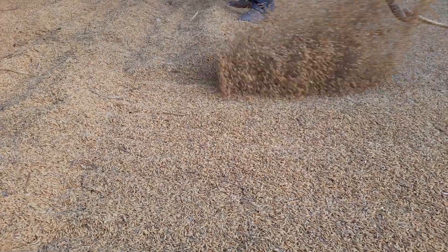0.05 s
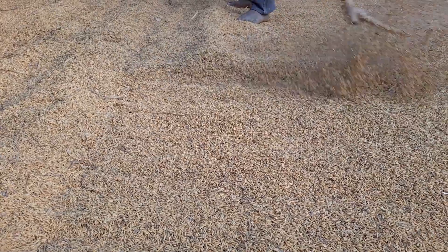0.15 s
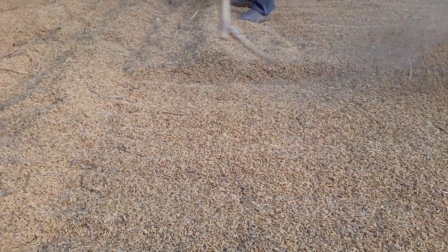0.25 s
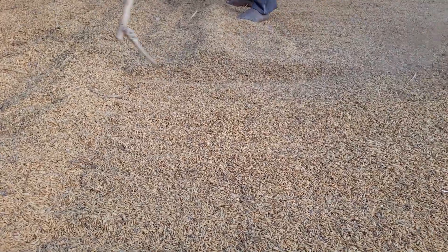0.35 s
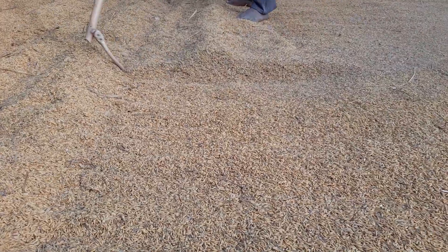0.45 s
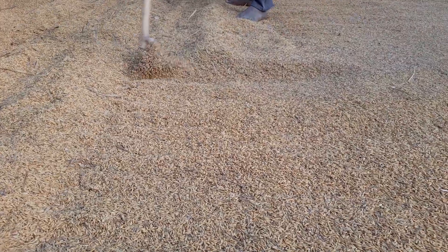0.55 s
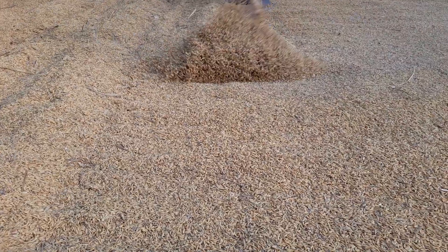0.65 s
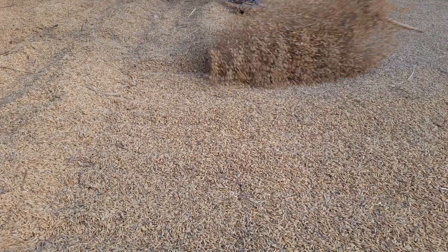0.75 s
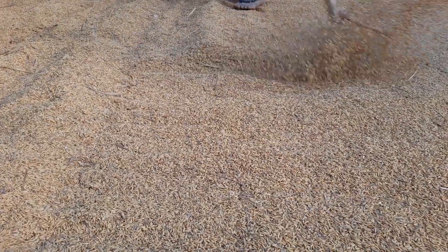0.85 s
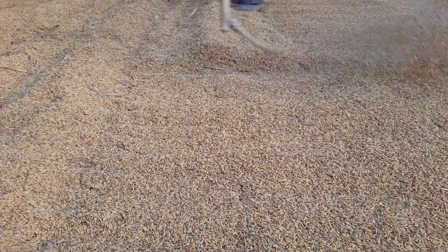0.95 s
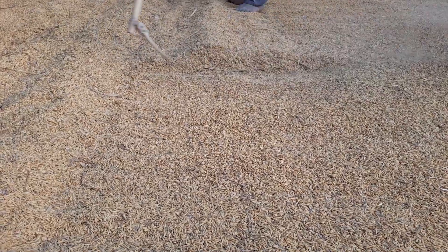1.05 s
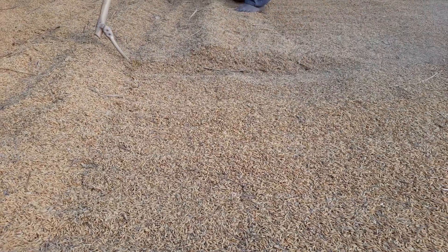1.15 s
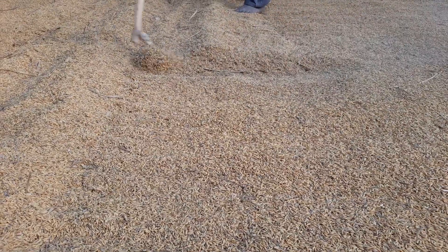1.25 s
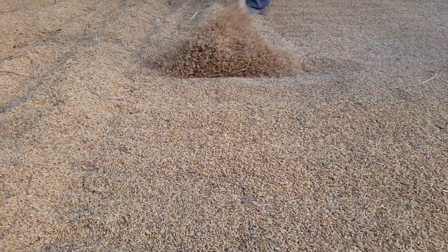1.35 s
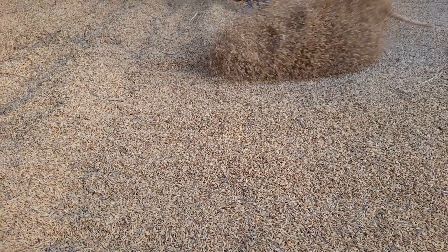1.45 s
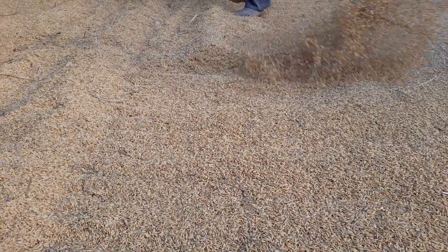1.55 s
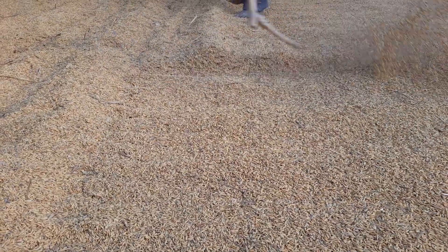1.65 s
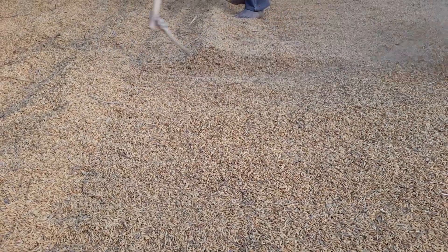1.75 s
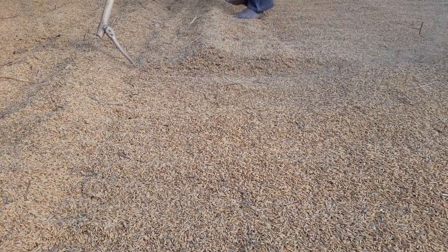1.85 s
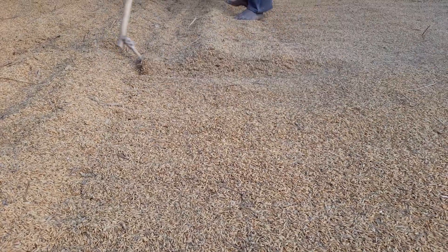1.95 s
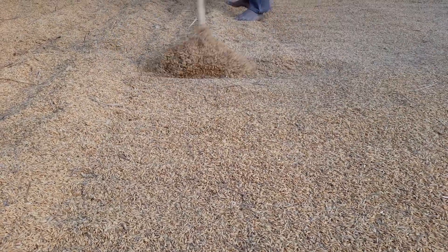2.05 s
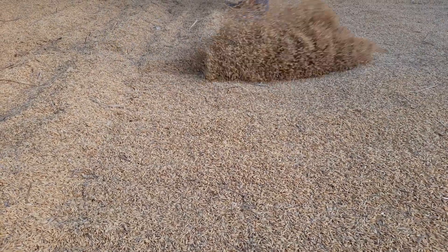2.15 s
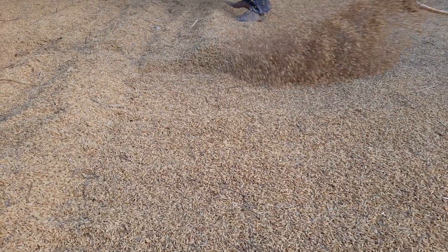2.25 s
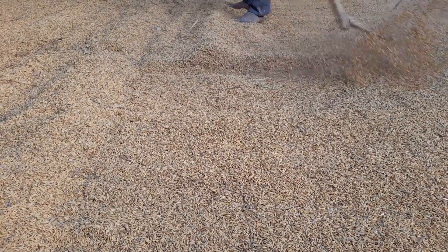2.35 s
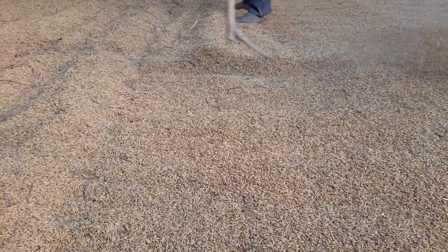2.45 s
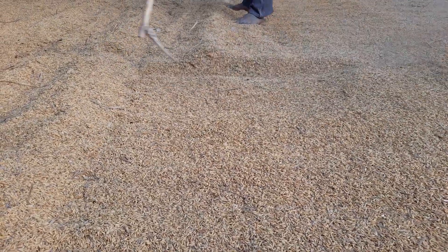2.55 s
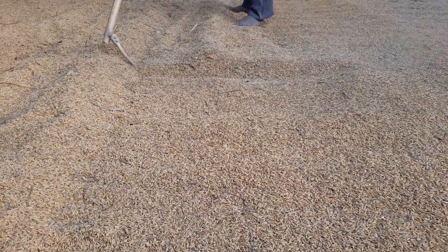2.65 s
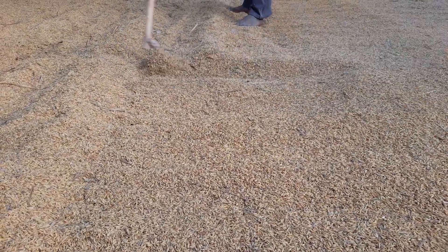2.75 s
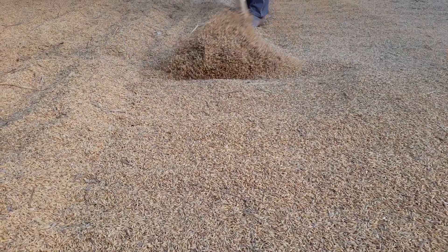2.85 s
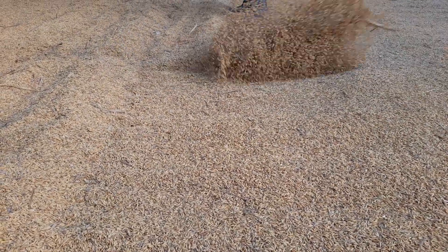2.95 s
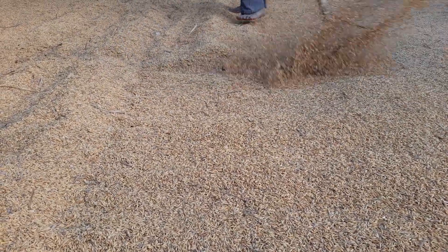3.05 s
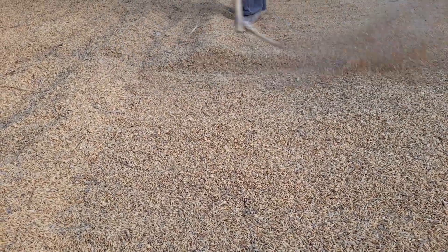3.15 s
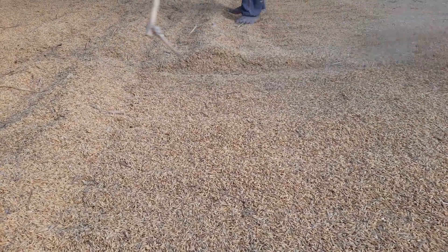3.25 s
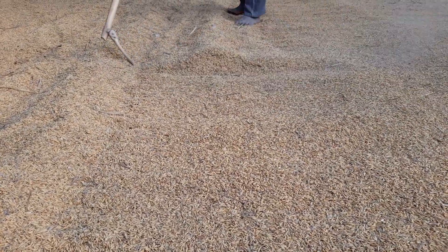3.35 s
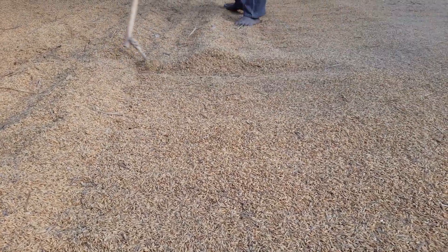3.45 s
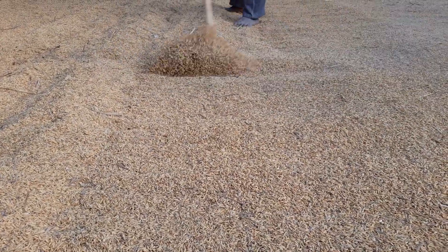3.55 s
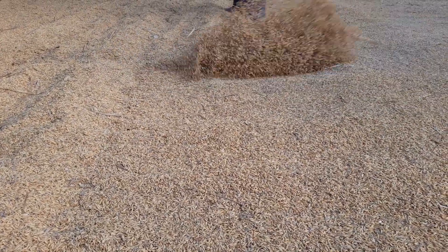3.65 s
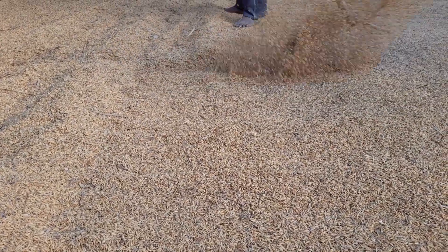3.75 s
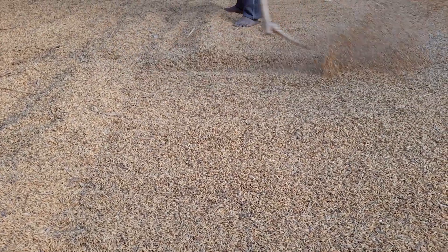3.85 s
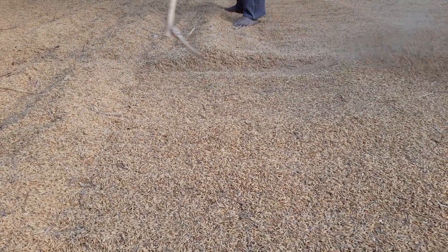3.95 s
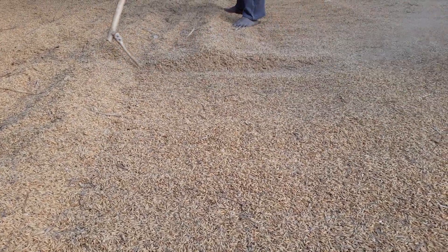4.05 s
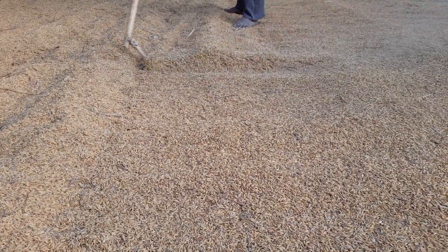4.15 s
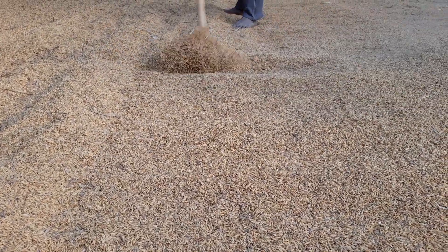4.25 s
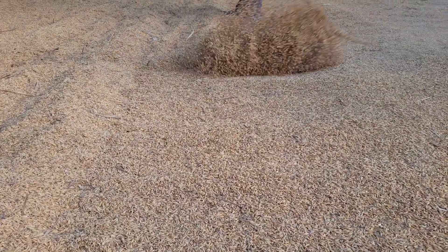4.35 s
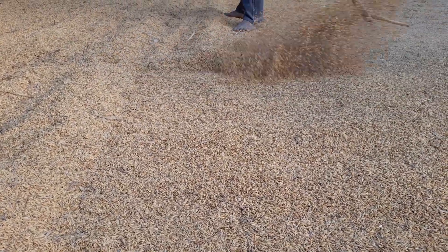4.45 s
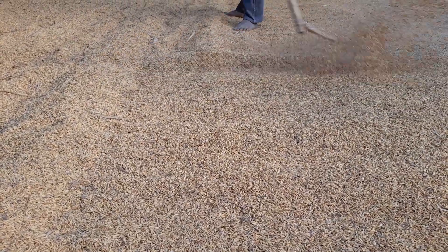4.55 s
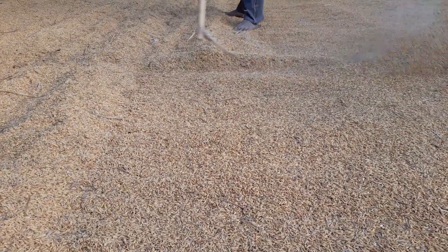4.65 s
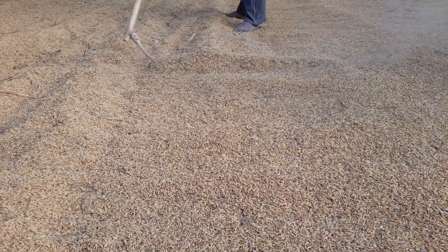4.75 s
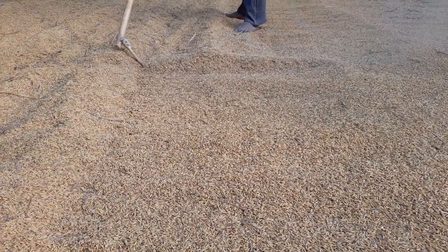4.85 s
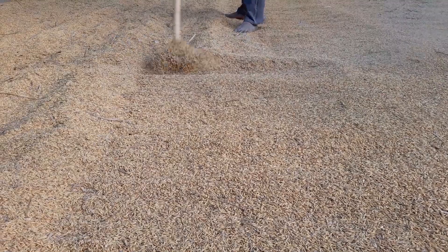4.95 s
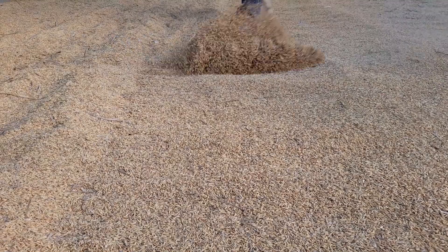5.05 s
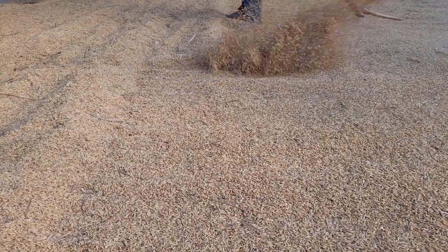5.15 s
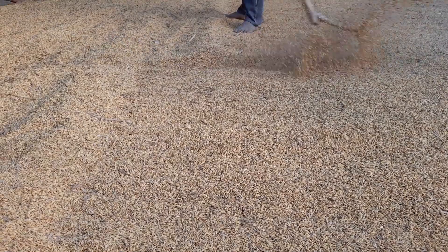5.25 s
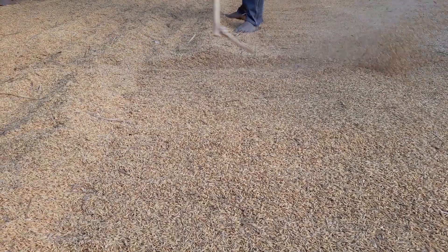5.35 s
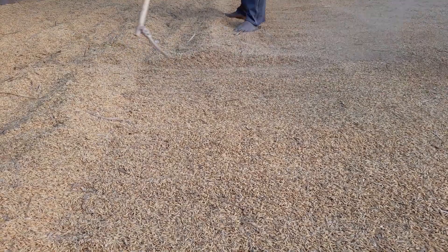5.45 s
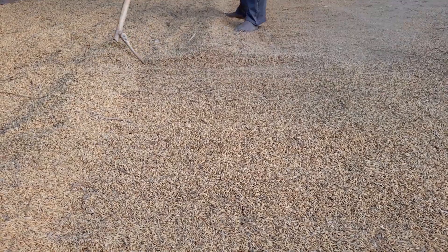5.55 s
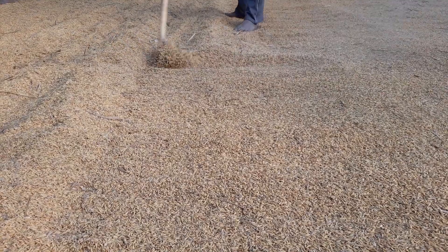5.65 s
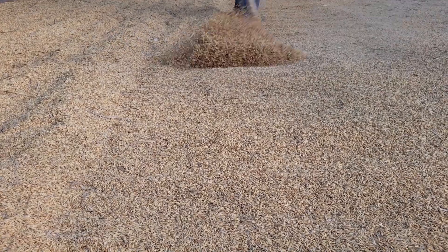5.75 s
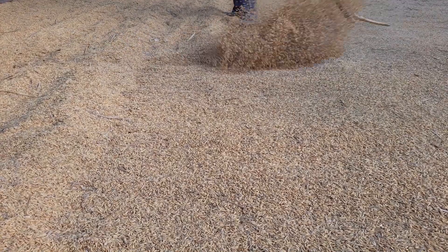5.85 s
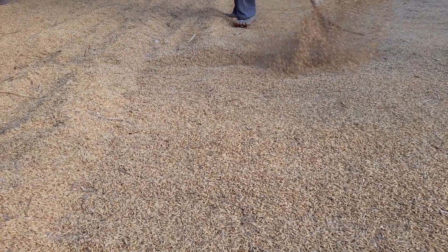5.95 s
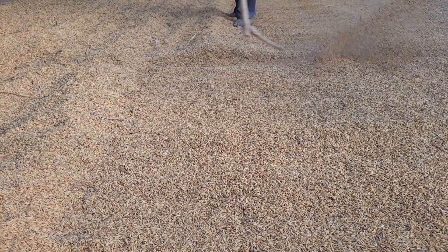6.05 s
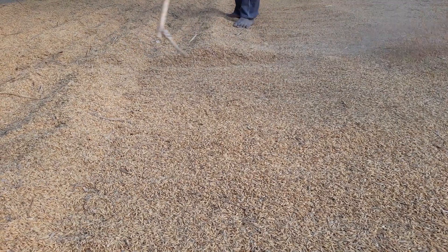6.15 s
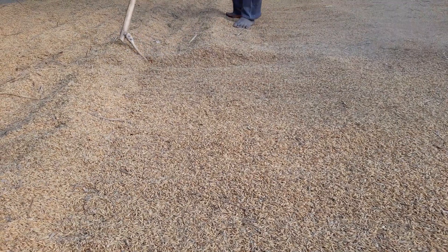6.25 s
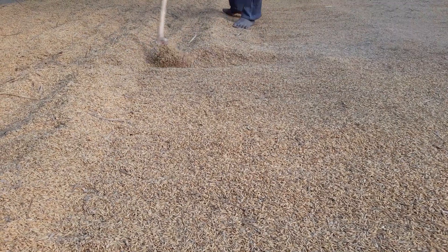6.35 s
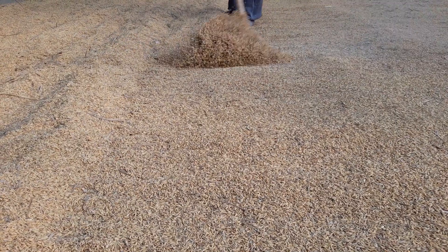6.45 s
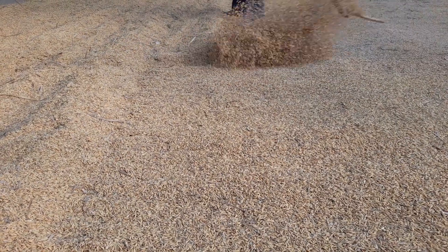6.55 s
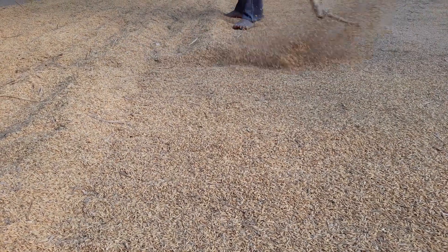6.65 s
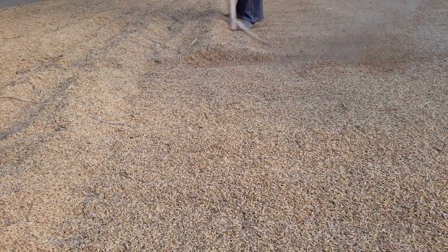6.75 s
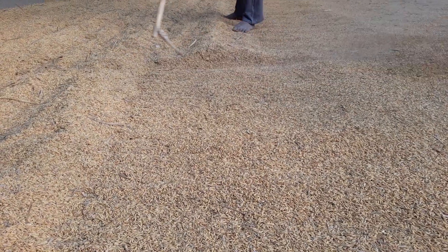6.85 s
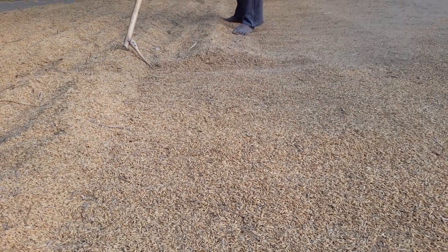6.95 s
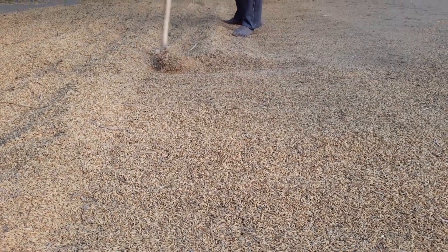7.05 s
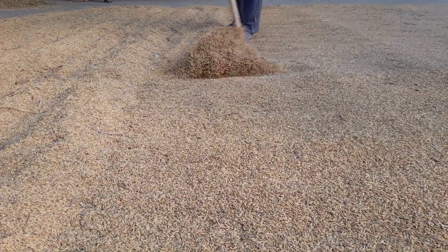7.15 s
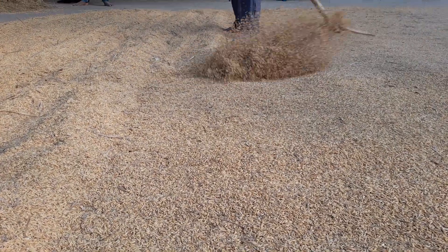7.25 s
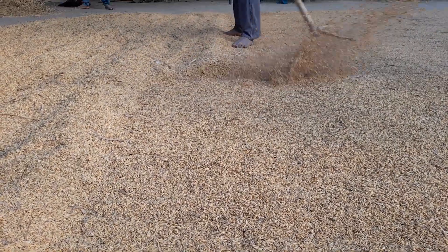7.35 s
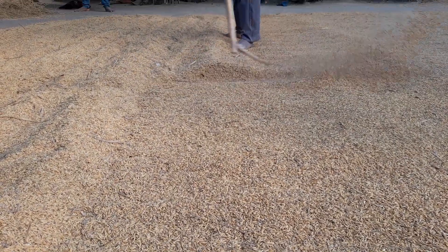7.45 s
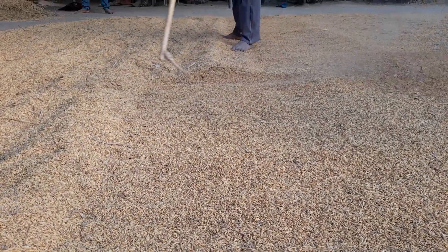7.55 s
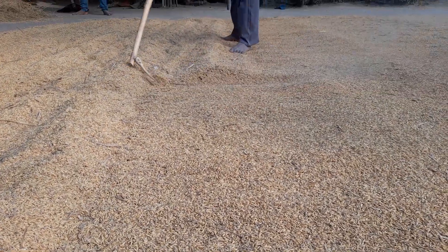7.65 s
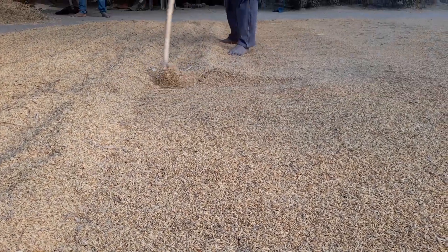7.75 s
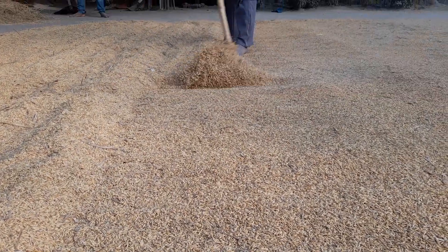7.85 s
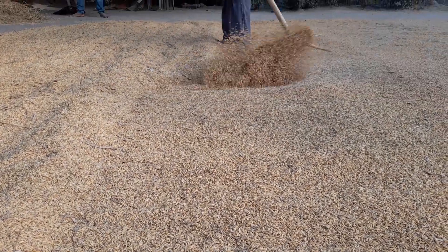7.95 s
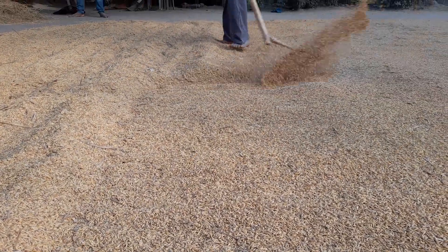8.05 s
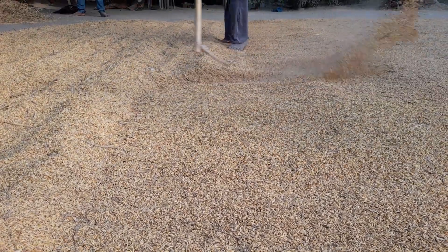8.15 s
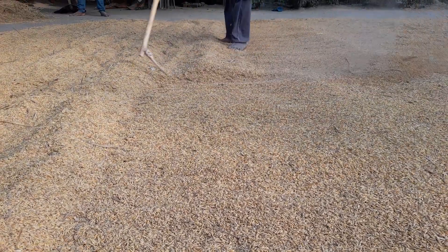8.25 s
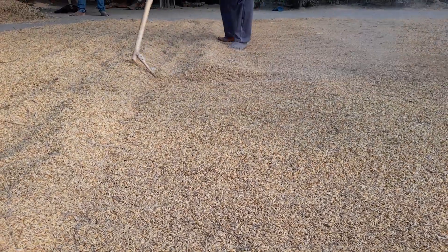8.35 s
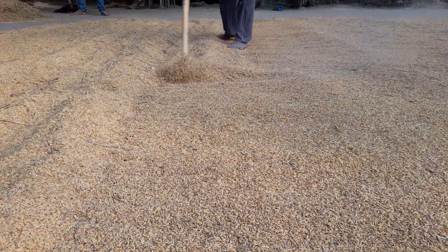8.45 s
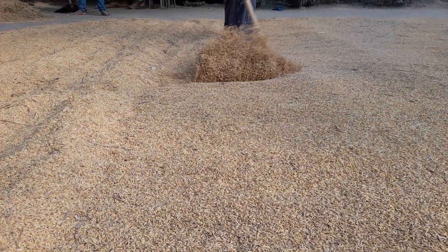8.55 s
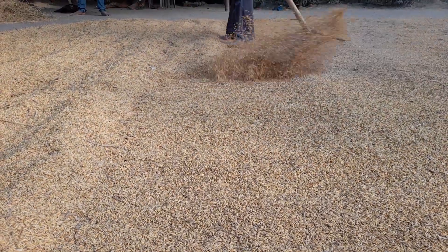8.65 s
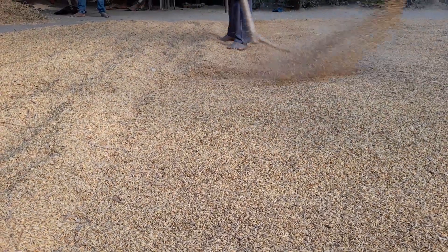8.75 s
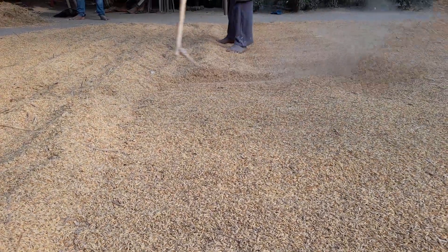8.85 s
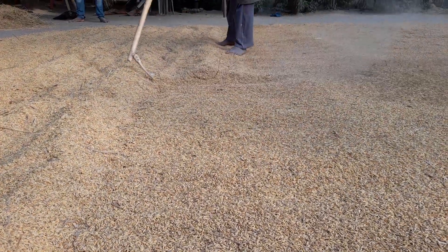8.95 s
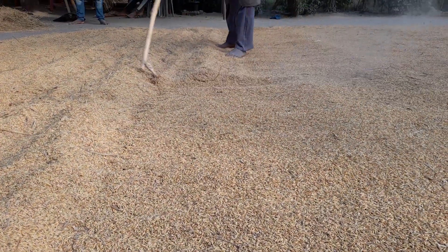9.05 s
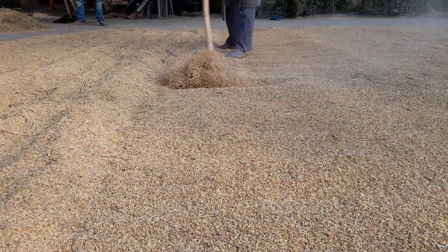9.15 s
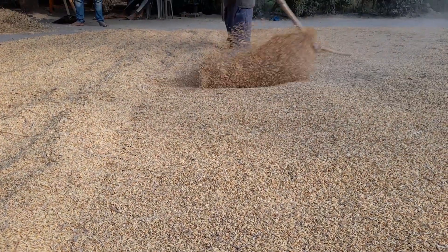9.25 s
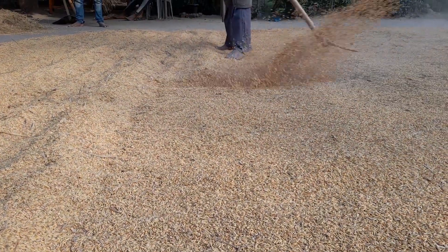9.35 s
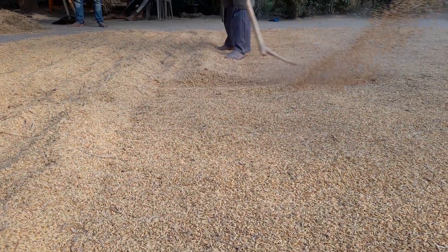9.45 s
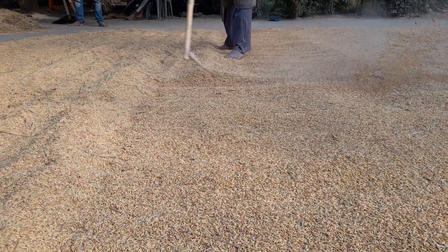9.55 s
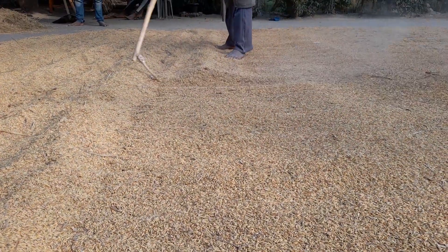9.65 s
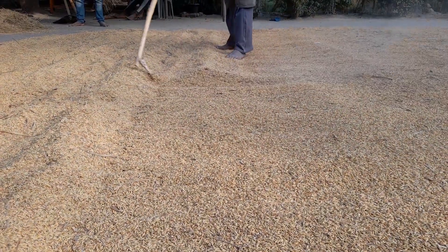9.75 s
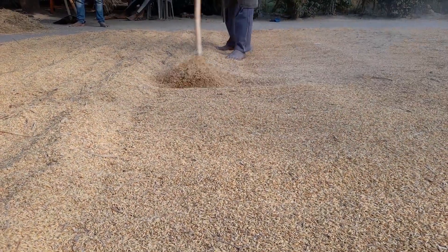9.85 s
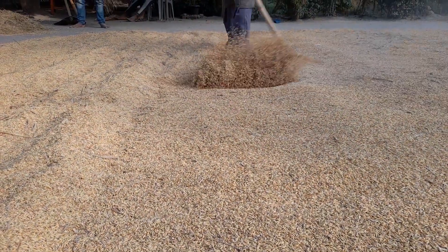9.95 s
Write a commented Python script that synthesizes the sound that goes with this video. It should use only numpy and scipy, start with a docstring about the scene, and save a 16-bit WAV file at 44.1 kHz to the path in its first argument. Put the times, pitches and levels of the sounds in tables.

```python
"""Raking grain in an open yard

A long wooden rake flings drying grain across a yard, a stroke about every 0.7 s. Streams of random tiny
impacts, shaped by spectra and resonances, make the blade crunch through the layer and ring on the ground.
Chirps of a few cycles are its judders. A sheet of grain lands with a short rush of impacts, and sparser
ones are husks and stragglers that hiss down until the next stroke."""
import sys
import numpy as np
from scipy import signal
from scipy.fft import rfft, irfft
from scipy.io import wavfile
from scipy.ndimage import map_coordinates

SR = 44100
rng = np.random.default_rng(int(sys.argv[2]) if len(sys.argv) > 2 else 0)


def unload_wav(signal):
    """Save mono or channel-first audio to the path in sys.argv[1] as 16-bit WAV at rate SR, clipped to [-1, 1]."""
    wavfile.write(
        sys.argv[1],
        SR,
        np.round(np.clip(np.atleast_2d(signal).T, -1, 1) * 32767).astype(np.int16),
    )


N = 440559
TIME = np.arange(N) / SR
BINS = np.maximum(np.fft.rfftfreq(N, 1 / SR), 1)   # frequencies in Hz, kept above 0 for the logarithm

# The rake strokes, the first already under way; levels are relative:
# [release t/s, time on the ground before it/s, time pushing the heap/s,
#  crunch level/dB, scrape level/dB, level of the spray of husks off the blade/dB]
RAKE_STROKES = [(0.014, 0.2, .17, -36.5, -31, -24.5), (0.744, 0.2, 0.17, -37.5, -31.5, -28.5),
                (1.454, 0.31, .17, -39, -31.5, -27.5), (2.198, 0.23, 0.17, -36, -31.5, -27),
                (2.945, 0.254, 0.13, -36, -31, -29.5), (3.678, 0.254, 0.14, -37, -30.5, -28.5),
                (4.372, 0.225, 0.15, -37, -30, -28), (5.111, 0.33, 0.15, -36, -31.5, -28.5),
                (5.832, 0.23, 0.15, -39, -31, -28), (6.531, .24, 0.14, -38, -32.5, -29),
                (7.238, 0.22, .15, -38, -32.5, -28.5), (7.937, 0.45, .16, -43, -33, -32),
                (8.604, 0.26, .135, -41, -34, -31.5), (9.267, 0.23, .12, -37.5, -33, -29.5),
                (9.982, 0.53, 0.11, -39, -34, -31.5)]
# Each thrown sheet comes down; levels are relative: [t/s, length/s, kernel level/dB, husk level/dB]
SHEET_LANDINGS = [(0.144, .08, -42, -31), (0.865, 0.082, -41.5, -31), (1.554, 0.086, -41.5, -29.5),
                  (2.311, 0.088, -42, -30.5), (3.066, 0.075, -41, -32.5), (3.81, 0.054, -47.5, -35),
                  (4.545, 0.048, -44, -31.5), (5.218, .09, -42, -34.5), (5.954, 0.093, -50, -36),
                  (6.642, 0.083, -41.5, -35), (7.336, 0.092, -42, -36.5), (8.014, 0.085, -50, -39),
                  (8.713, 0.076, -44.5, -36.5), (9.37, 0.11, -48.5, -37)]


def from_db(db):
    """Decibels to gain."""
    return 10 ** (np.asarray(db) / 20)


def rms_one(x):
    """Scale to an average strength (rms) of 1."""
    return x / np.sqrt(np.mean(x ** 2) + 1e-20)


def per_bin(points):
    """Read a table at every frequency, with straight lines over log frequency."""
    hz, values = np.transpose(points)
    return np.interp(np.log(BINS), np.log(hz), values)


def envelope(start_s, end_s, rise_db_per_s, fall_db_per_s, growth_db_per_s=0):
    """Gain that rises until start_s, holds or grows to 1 at end_s, then dies away."""
    early = np.maximum(start_s - TIME, 0)
    late = np.maximum(TIME - end_s, 0)
    still_to_grow = end_s - np.clip(TIME, start_s, end_s)
    db_below = rise_db_per_s * early + growth_db_per_s * still_to_grow + fall_db_per_s * late
    return from_db(-np.minimum(db_below, 200))


def drift(rate):
    """Smooth chance with spread 1 that changes about rate times a second."""
    knots = rng.standard_normal(6000)
    # straight lines between the knots shrink the spread, so it is restored
    return np.interp(TIME * rate, np.arange(len(knots)), knots) * np.sqrt(3 / 2)


def grains(per_s, spread_db):
    """Two unrelated streams of tiny impacts: many faint, a few strong."""
    sizes = from_db(spread_db * np.minimum(rng.exponential(1, (2, N)), 5))
    signs = rng.choice([-1, 1], (2, N))
    hits = rng.random((2, N)) < per_s / SR
    return rms_one(sizes * signs * hits)


def colour(points):
    """Response with the given spectrum that never sounds ahead of its impact (minimum phase)."""
    cepstrum = irfft(np.log(from_db(per_bin(points))), N)
    # fold the half before time zero onto the half after it
    cepstrum[1:N // 2] *= 2
    cepstrum[N // 2:] = 0
    return np.exp(rfft(cepstrum))


def body(modes):
    """Response of resonances side by side, with alternating signs."""
    response = 0
    for k, (hz, width, db) in enumerate(modes):
        detuning = hz / width * (BINS / hz - hz / BINS)
        response = response + (-1) ** k * from_db(db) / (1 + 1j * detuning)
    return response


def radiate(force, response, focus=0.88):
    """Two force streams sound at both microphones; focus 1 is a compact source, 0 a spread one."""
    # weight on each source's left-right likeness: [f/Hz, weight]
    likeness = [(50, 1.03), (300, 1), (900, 1), (2500, 0.9), (4000, 0.9), (7000, 0.67), (14000, 1.5)]
    # left minus right microphone: [f/Hz, difference/dB]
    balance = [(1500, 0), (2700, 0.7), (4800, -1.5), (6500, 0.6), (8700, -0.5), (11000, 1.5), (12300, 0),
               (13600, 9), (15500, -0.5)]
    mid, side = rfft(force) * response
    alike = np.clip(focus * per_bin(likeness), 0, .99)
    sides = np.array([[1], [-1]])   # left, right
    pair = np.sqrt(1 + alike) * mid + sides * np.sqrt(1 - alike) * side
    out = irfft(pair * from_db(sides * per_bin(balance) / 2), N)
    return out / np.std(out.mean(axis=0))


def place(pair, lead_s):
    """A source on the left reaches the left microphone lead_s earlier."""
    shifted = []
    for x, sign in zip(pair, (1, -1)):
        read_at = np.arange(N) + sign * lead_s * SR / 2
        shifted.append(map_coordinates(x, [read_at], order=5))
    return np.array(shifted)


def yard(air_db=-65):
    """Steady noise shaped into a distant rumble and a faint open-air background."""
    # slow changes of the low outdoor rumble: [t/s, level/dB]
    rumble_levels = [(0, -64.5), (2.3, -65.5), (4.0, -63), (4.75, -66), (5.6, -60.5), (6.6, -62.5),
                     (7.8, -68.5), (8.3, -64.5), (9.35, -58), (9.75, -64.5)]
    # spectra of rumble and air: [f/Hz, relative level per Hz/dB]
    rumble_spectrum = [(22, -36), (45, -5.5), (70, -1.5), (95, 2.5), (135, -5), (200, -13.5), (400, -10),
                       (1000, -38)]
    air_spectrum = [(100, -18), (300, 5), (600, 5.5), (1050, 3), (2000, -2), (4000, 1), (6500, -16),
                    (16000, -30)]
    rumble = radiate(rng.standard_normal((2, N)), colour(rumble_spectrum), focus=0.51)
    rumble_gain = from_db(np.interp(TIME, *np.transpose(rumble_levels)))
    air = radiate(rng.standard_normal((2, N)), colour(air_spectrum), focus=0.056)
    return rumble_gain * rumble + from_db(air_db) * air


def brushing(brush_db=3.0, rise_db_per_s=130, fall_db_per_s=220, foot_fade_db_per_s=100):
    """The rake rubs lightly over the top of the layer; a foot presses into it with a duller crunch."""
    # dull rubs over the layer between strokes: [t/s, length/s, relative level/dB]
    brushes = [(.11, 0.041, -37.5), (0.876, .14, -42), (8.055, 0.1, -59)]
    # a foot shifts in the grain: (t/s, length/s, level/dB)
    shuffle = (8.78, 0.2, -55)
    # spectra of a rub and of the foot: [f/Hz, relative level per Hz/dB]
    brush_spectrum = [(120, -32), (280, -5.5), (420, -8), (560, 3), (760, -11), (1000, -6.5), (2000, -2.5),
                      (4000, -13.5)]
    foot_spectrum = [(50, -6), (130, -2), (380, -10.5), (900, -26)]
    rubs = sum(from_db(db) * envelope(s, s + length, rise_db_per_s, fall_db_per_s)
               for s, length, db in brushes)
    rake = rubs * radiate(grains(per_s=4500, spread_db=3.0), colour(brush_spectrum))
    s, length, db = shuffle
    press = from_db(db) * envelope(s, s + length, rise_db_per_s, foot_fade_db_per_s)
    foot = press * radiate(grains(per_s=1100, spread_db=2.0), colour(foot_spectrum))
    return from_db(brush_db) * rake + foot


def cracking(rows):
    """Dying bursts of force from rows of (t/s, level/dB, decay/s), mostly alike in both channels."""
    force, t = np.zeros((2, N)), np.arange(SR // 10) / SR
    for s, db, decay_s in rows:
        at = int(s * SR)
        noise = rng.standard_normal(len(t)) + rng.standard_normal((2, len(t))) / 2
        force[:, at:at + len(t)] += from_db(db) * np.exp(-t / decay_s) * noise
    return force


def ticks(tick_db=7.0, knock_db=4.0, knock_decay_s=0.003):
    """Each snap, scatter or knock is a burst of cracking that dies away, mostly within milliseconds."""
    # hard kernels and grit snap or scatter: [t/s, relative level/dB, decay/s]
    snap_rows = [(3.841, -34, 0.0016), (3.86, -35, .005), (4.13, -23.5, 0.001), (4.133, -39, 0.073),
                 (4.748, -33.5, 0.0015), (5.284, -28, .0014), (5.319, -26, .0014), (5.474, -24, 0.0019),
                 (5.541, -34.5, 0.0023), (6.055, -37, 0.0037), (7.665, -44, 0.018), (9.47, -40, 0.0021)]
    # the handle knocks dully in its socket: [t/s, relative level/dB]
    knock_rows = [(5.176, -35), (5.223, -33), (5.319, -42), (6.169, -37.5), (6.649, -30), (6.96, -44)]
    # spectra of a snap and of a knock: [f/Hz, relative level per Hz/dB]
    snap_spectrum = [(200, -11.5), (950, -11.5), (1500, -4), (4000, -3.5), (7000, -5), (9500, -25),
                     (16000, -20)]
    knock_spectrum = [(80, -17), (250, 1.5), (900, 0), (2500, -2.5), (7000, -10), (12000, -30)]
    snaps = rfft(cracking(snap_rows)) * colour(snap_spectrum)
    knocks = rfft(cracking([(s, db, knock_decay_s) for s, db in knock_rows])) * colour(knock_spectrum)
    return irfft(from_db(tick_db) * snaps + from_db(knock_db) * knocks, N)


def loose_husks(fan_db_per_s=75, clear_db_per_s=560, arrive_db_per_s=130, shower_fade_db_per_s=90,
                tail_db=-2.5, settle_db_per_s=22, airborne_s=.38, last_db_per_s=55, trickle_db=-45):
    """Husks fan off the blade until release and shower down; stragglers settle while they can stay up."""
    shower_s = 0.073   # the shower is thickest for this long at the end of a landing
    ordinary_db, follows = -31, .3   # husk level of an ordinary throw; share of any excess in stragglers
    power = from_db(trickle_db) ** 2
    for s, *_, db in RAKE_STROKES:
        fan = envelope(s, s, fan_db_per_s, clear_db_per_s)
        power = power + (from_db(db) * fan) ** 2
    for s, length, _, db in SHEET_LANDINGS:
        end = s + length
        shower = envelope(end - shower_s, end, arrive_db_per_s, shower_fade_db_per_s)
        settling = envelope(end, end, arrive_db_per_s, settle_db_per_s)
        stragglers = settling * envelope(s, s + airborne_s, 0, last_db_per_s)
        tail = from_db(tail_db + ordinary_db + follows * (db - ordinary_db))
        power = power + (from_db(db) * shower) ** 2 + (tail * stragglers) ** 2
    return np.sqrt(power)


def sheets(rise_db_per_s=200, thicken_db_per_s=35, stop_db_per_s=380):
    """A sheet of grain lands thicker and thicker, then stops short."""
    return sum(from_db(db) * envelope(s, s + length, rise_db_per_s, stop_db_per_s, thicken_db_per_s)
               for s, length, db, _ in SHEET_LANDINGS)


def falling_grain(landing_db=8.0, husk_db=1.0, flutter_db=1.0, clump_db=3.26, lead_s=-0.000095):
    """The sheet lands on the right in clumps; husks patter all around, denser the more of them move."""
    # spectra of landing kernels and of husks: [f/Hz, relative level per Hz/dB]
    landing_spectrum = [(250, -27.5), (800, -14.5), (1050, -10.5), (1250, -1), (1580, 3.5), (2300, -6.5),
                        (2700, 2), (3100, -6.5), (3600, 4.5), (5800, -2), (7400, -0.5), (8600, 0),
                        (10600, 4), (15000, -12.5)]
    husk_spectrum = [(900, -31.5), (1600, -23.5), (3000, -15), (5400, -9.5), (7200, -9.5), (8300, -15),
                     (9400, -7.5), (11000, 0), (13900, 5), (15500, 3)]
    kernels = grains(per_s=6000, spread_db=3.0) * from_db(clump_db * drift(80))
    landing = place(radiate(kernels, colour(landing_spectrum), focus=0.79), lead_s)
    flow = loose_husks()
    density = rms_one(flow)
    # the root evens out the strength, so density changes only the texture and flow sets the level
    patter = grains(per_s=16000 * density, spread_db=2.0) / np.sqrt(density)
    husks = radiate(patter * from_db(flutter_db * drift(110)), colour(husk_spectrum), focus=0.013)
    husks = husks * from_db([[1.2], [-1.2]])   # a little stronger on the left
    return from_db(landing_db) * sheets() * landing + from_db(husk_db) * flow * husks


def sweep(centre_s=0.031, lead_per_s=0.0011, widest_s=0.00016):
    """Arrival-time difference of the rake, crossing left to right, centred just before each release."""
    crossings = np.array(RAKE_STROKES)[:, 0] - centre_s
    halfway = (crossings[1:] + crossings[:-1]) / 2
    nearest = crossings[np.searchsorted(halfway, TIME)]
    return np.clip(lead_per_s * (nearest - TIME), -widest_s, widest_s)


def strokes(pile_db_per_s=280, shed_db_per_s=140, build_db_per_s=18, speed_up_db_per_s=140,
            slow_db_per_s=85, crumble_db=-15, crumble_db_per_s=80):
    """The blade touches down, gathers a heap, speeds up, eases off and lifts; the furrow crumbles."""
    drive_s, ease_s = 0.099, 0.047   # before release: driven hardest from drive_s, eased off from ease_s
    touch_db_per_s, lift_db_per_s = 500, 583   # how fast the blade meets the ground and leaves it
    load, speed = np.zeros((2, N))
    for s, ground_s, push_s, crunch_db, scrape_db, _ in RAKE_STROKES:
        crumble = from_db(crumble_db) * envelope(s, s, touch_db_per_s, crumble_db_per_s)
        contact = np.maximum(envelope(s - ground_s, s, touch_db_per_s, lift_db_per_s), crumble)
        push = envelope(s - push_s, s - ease_s, pile_db_per_s, shed_db_per_s, build_db_per_s)
        drive = envelope(s - drive_s, s - ease_s, speed_up_db_per_s, slow_db_per_s)
        load += from_db(crunch_db) * contact * push
        speed += from_db(scrape_db) * contact * drive
    return load, speed


def judders(pitch_hz=2450, overtone_db=-15, right_db=-5.5):
    """A hard catch makes a few cycles of stick-slip near the blade's pitch, with overtones."""
    # the blade catches on the ground and chirps: [peak t/s, level on the left/dB, rise/s]
    catches = [(0.577, -19, .0015), (0.657, -20, 0.00076), (.680, -18, 0.00036), (2.142, -13, 0.001),
               (2.151, -27, 0.00055), (3.6146, -11, 0.00044), (3.631, -12.5, 0.00082),
               (4.301, -17, 0.00083), (5.064, -14, 0.00054), (5.069, -13, 0.00047), (6.478, -7.5, .0006),
               (7.1342, -14, .0005), (7.205, -13.5, .0008), (7.884, -14.5, .0014), (8.503, -15.5, .001),
               (8.567, -14, 0.00088), (9.906, -17, 0.0007)]
    out, t = np.zeros(N), np.arange(SR // 50) / SR
    for (s, db, rise_s), detune in zip(catches, rng.normal(0, 0.035, len(catches))):
        swell = (t / rise_s) ** 2 * np.exp(2 - 2 * t / rise_s)   # reaches 1 after rise_s
        phase = 2 * np.pi * pitch_hz * (1 + detune) * t
        overtones = np.sin(2 * phase) + np.sin(3 * phase) / 2
        chirp = swell * (np.sin(phase) + from_db(overtone_db) * overtones)
        at = int((s - rise_s) * SR)
        out[at:at + len(t)] += from_db(db) * chirp
    return out * from_db([[0], [right_db]])


def heap(load, lumpy_db=3.0, crunch_db=2.5, handle_db=-1.5):
    """The pushed heap gives way in small slides that also shake the handle."""
    # spectrum of the crunch: [f/Hz, relative level per Hz/dB]
    crunch_spectrum = [(50, -51), (130, -5), (260, -11), (450, 2), (620, -1.5), (870, 4), (1130, 0.5),
                       (1400, 2.5), (2500, 1), (4000, -22.5)]
    # resonances of the handle: [f/Hz, width/Hz, relative level/dB]
    handle_modes = [(280, 29.5, -1), (435, 11, 0.5), (513, 92, -9.5), (980.4, 41, 5)]
    slides = from_db(lumpy_db * drift(110))
    crunch = radiate(grains(per_s=4000, spread_db=2.5) * slides, colour(crunch_spectrum))
    handle = radiate(grains(per_s=2500, spread_db=2.5) * slides, body(handle_modes))
    return load * (from_db(crunch_db) * crunch + from_db(handle_db) * handle)


def blade(speed, chatter_db=2.0, ring_db=0.5, clump_db=1.2, fly_s=0.013, steeper=0.027):
    """The edge sticks and slips on the ground and rings; just after, kernels slide off its face in clumps."""
    # resonances of the blade: [f/Hz, width/Hz, relative level/dB]
    blade_modes = [(1538, 10.4, -2), (1983, 54, -1.5), (2298, 83, -3.5), (2677, 82, 3), (3595, 45, -7),
                   (4845, 220, -8.5), (6300, 68, -35), (7530, 96, -11)]
    # spectrum of the sliding kernels: [f/Hz, relative level per Hz/dB]
    scrape_spectrum = [(900, -10.5), (1800, -3), (2800, -5.5), (3200, 4), (5600, -2), (7300, 3.5),
                       (8400, -4.5), (10500, 4.5), (16000, -7)]
    slips = grains(per_s=2200, spread_db=2.5) * from_db(chatter_db * drift(160))
    ring = speed * radiate(slips, body(blade_modes))
    shed = speed * (speed / speed.max()) ** steeper   # kernels favour a fast blade very slightly
    kernels = grains(per_s=7000, spread_db=3.5) * from_db(clump_db * drift(90))
    late_shed = np.interp(TIME - fly_s, TIME, shed)
    rub = late_shed * radiate(kernels, colour(scrape_spectrum))
    return from_db(ring_db) * ring + rub


def scene():
    """Rake, grain and yard; open ground gives no reverberation."""
    load, speed = strokes()
    rake = place(heap(load) + blade(speed) + judders(), sweep())
    return rake + ticks() + falling_grain() + brushing() + yard()


def record(dry):
    """The top is cut steeply, with a filter run forwards and backwards so that nothing is delayed."""
    cutoff_hz = 15850
    low_pass = signal.ellip(10, .1, 60, cutoff_hz, fs=SR, output="sos")
    return signal.sosfiltfilt(low_pass, dry)


dry = scene()
out = record(dry)
unload_wav(out)
```